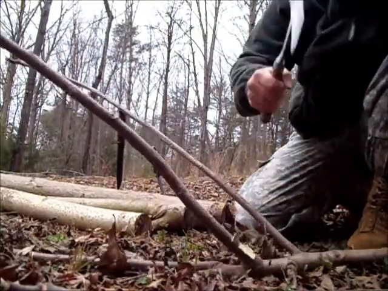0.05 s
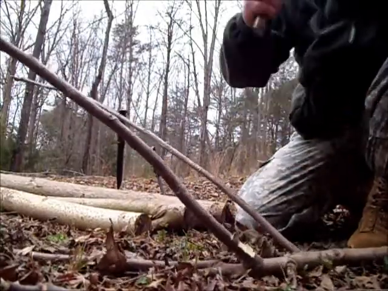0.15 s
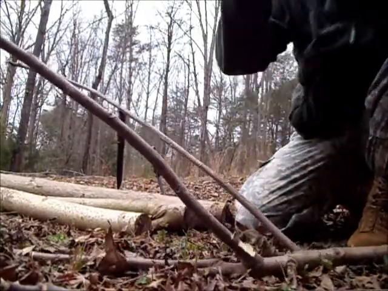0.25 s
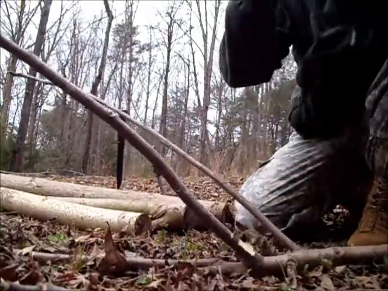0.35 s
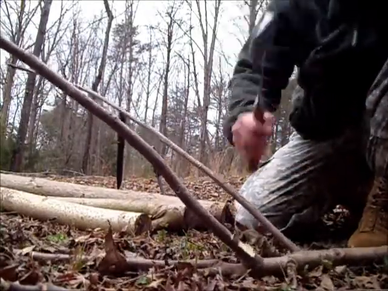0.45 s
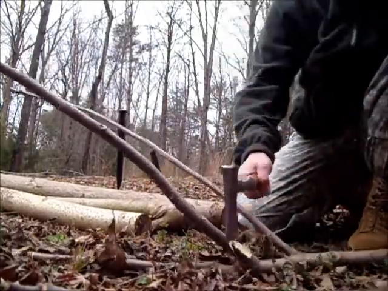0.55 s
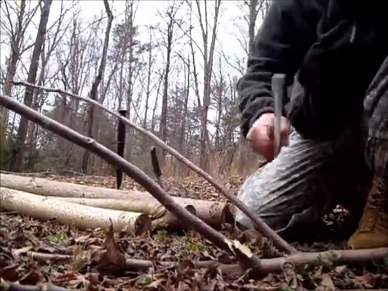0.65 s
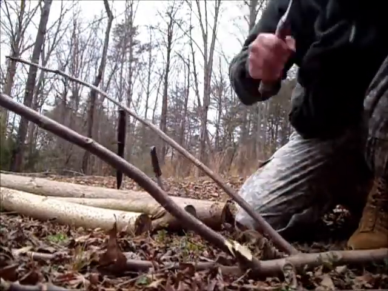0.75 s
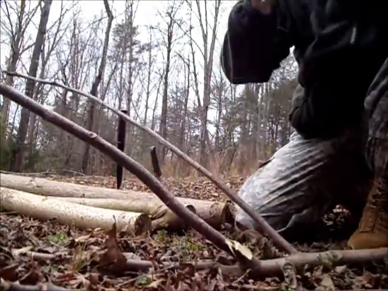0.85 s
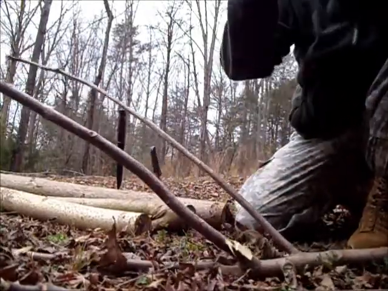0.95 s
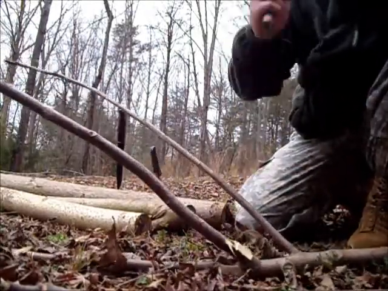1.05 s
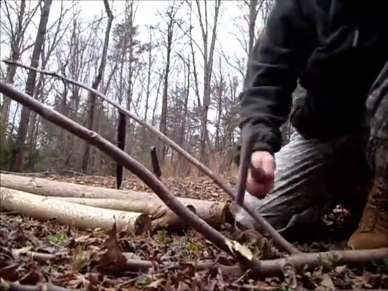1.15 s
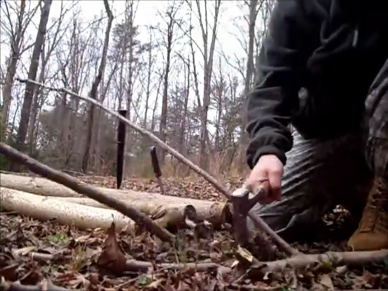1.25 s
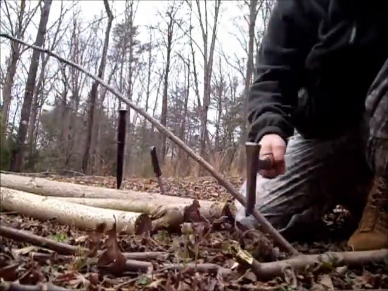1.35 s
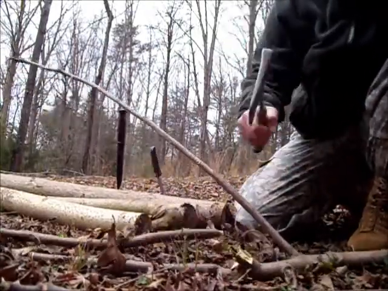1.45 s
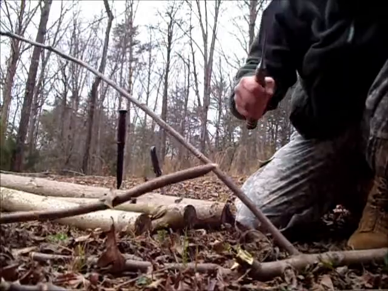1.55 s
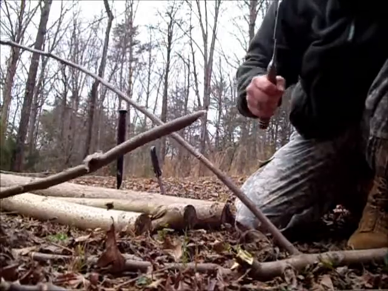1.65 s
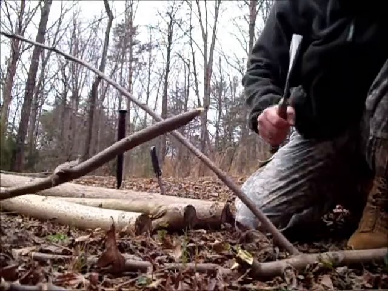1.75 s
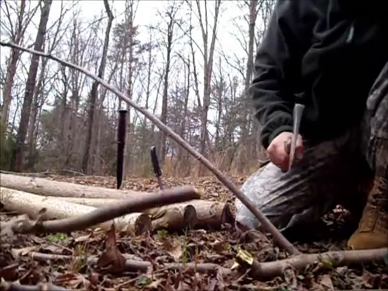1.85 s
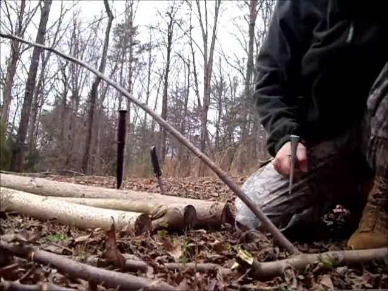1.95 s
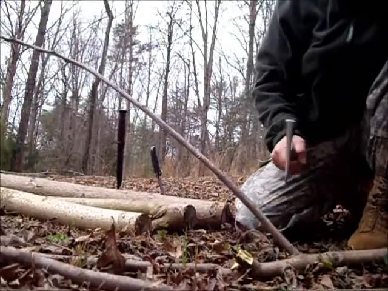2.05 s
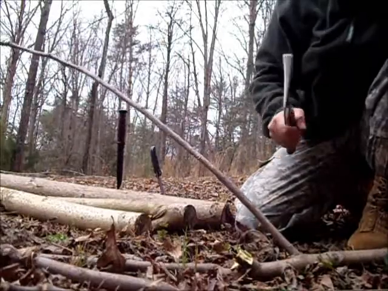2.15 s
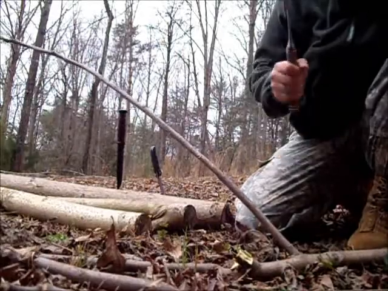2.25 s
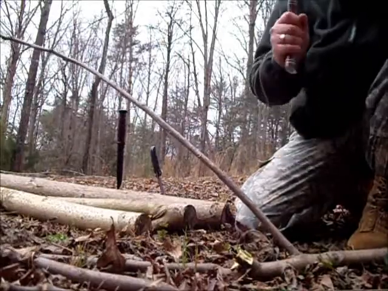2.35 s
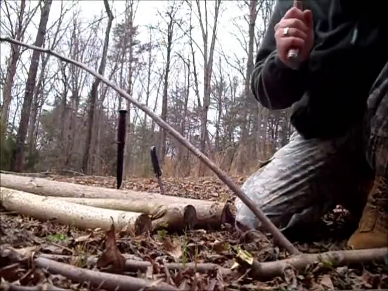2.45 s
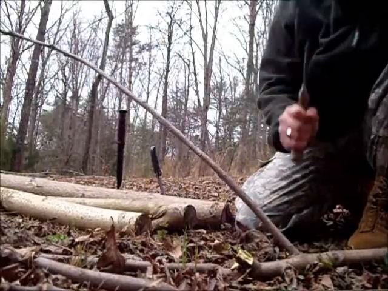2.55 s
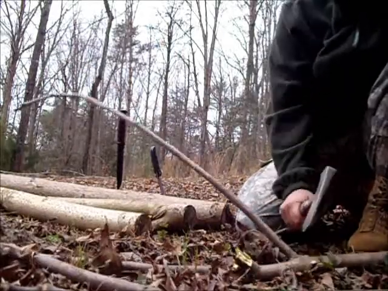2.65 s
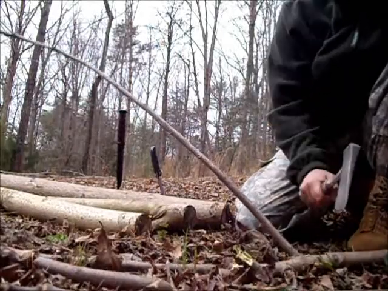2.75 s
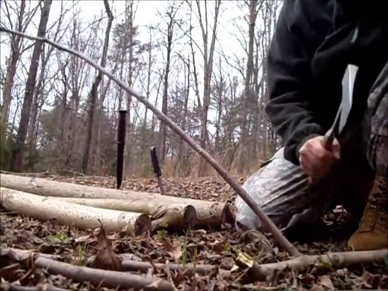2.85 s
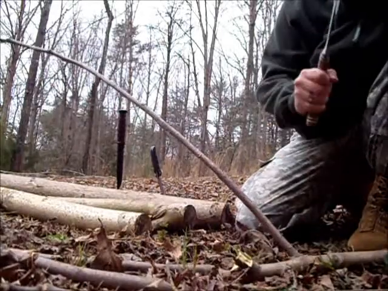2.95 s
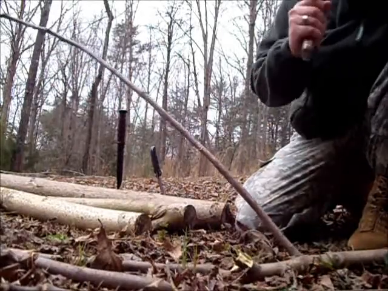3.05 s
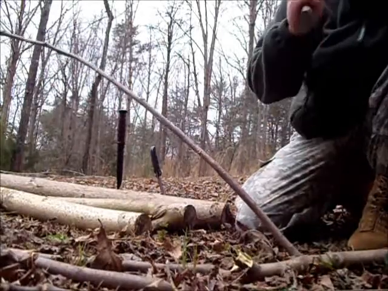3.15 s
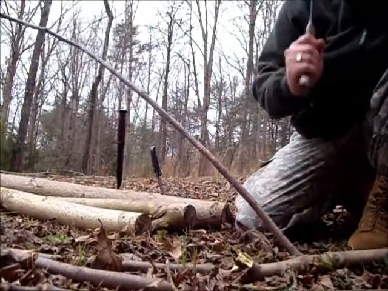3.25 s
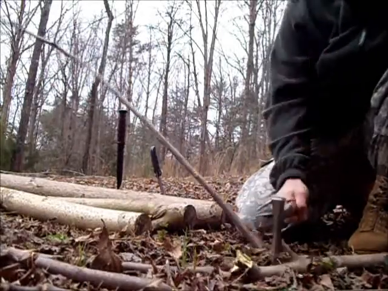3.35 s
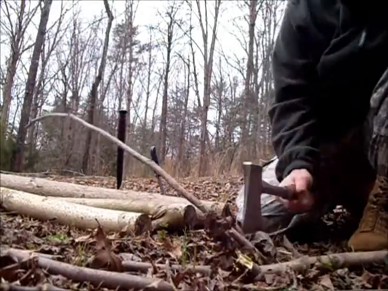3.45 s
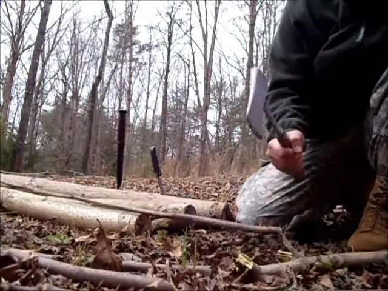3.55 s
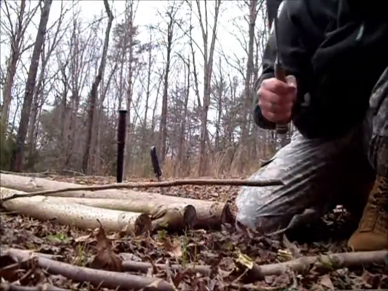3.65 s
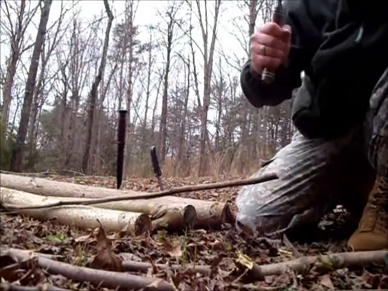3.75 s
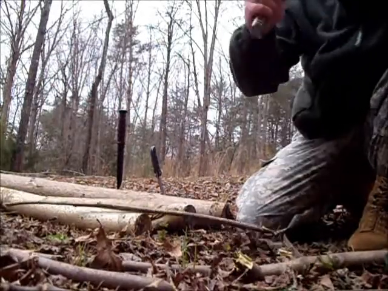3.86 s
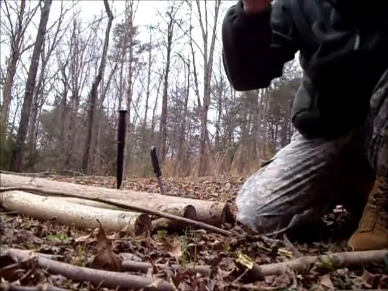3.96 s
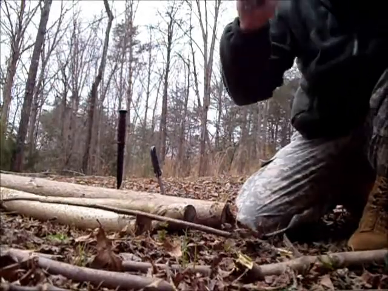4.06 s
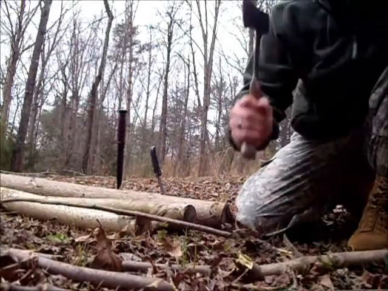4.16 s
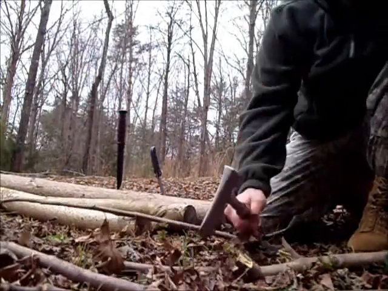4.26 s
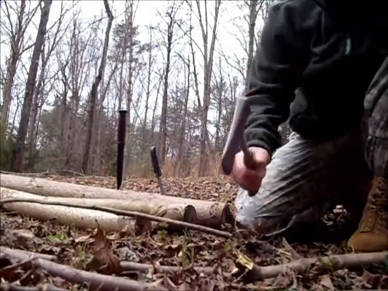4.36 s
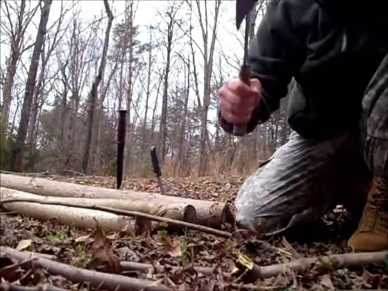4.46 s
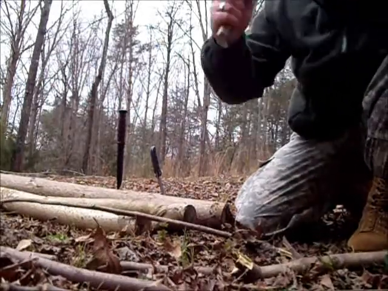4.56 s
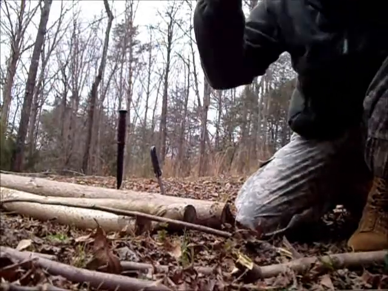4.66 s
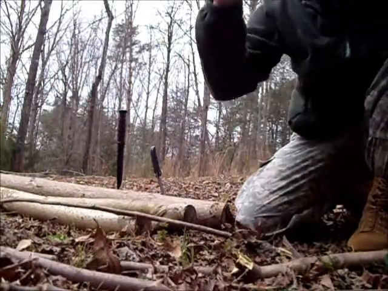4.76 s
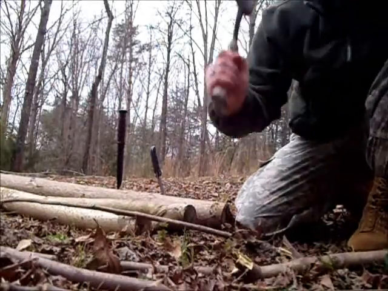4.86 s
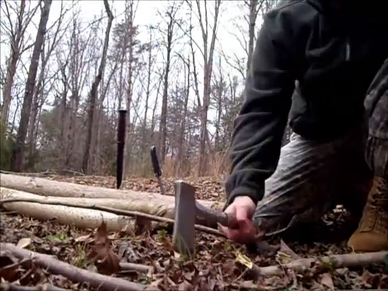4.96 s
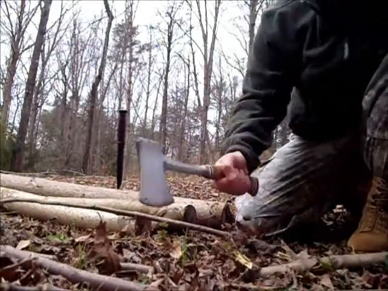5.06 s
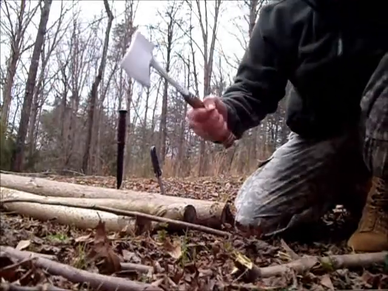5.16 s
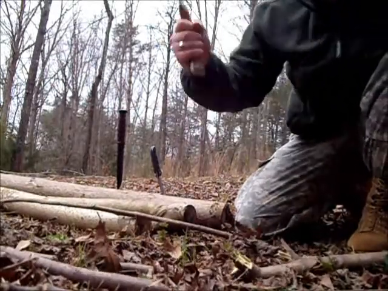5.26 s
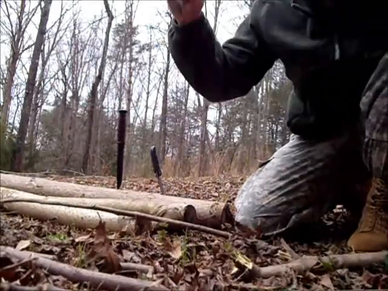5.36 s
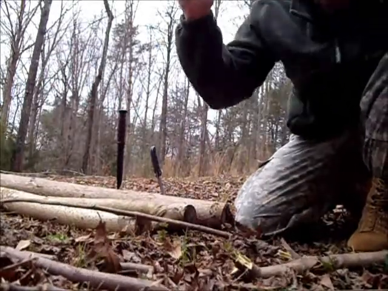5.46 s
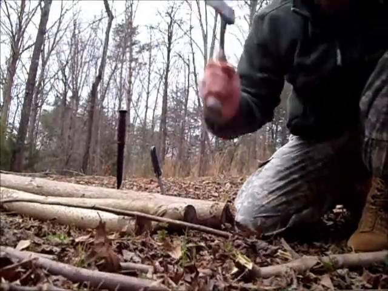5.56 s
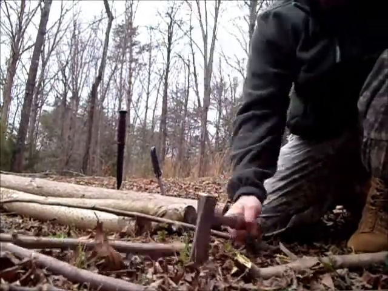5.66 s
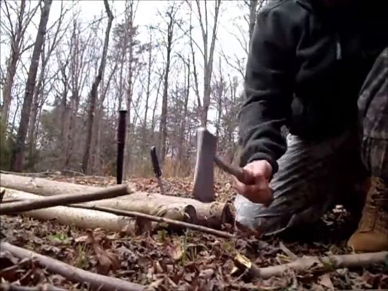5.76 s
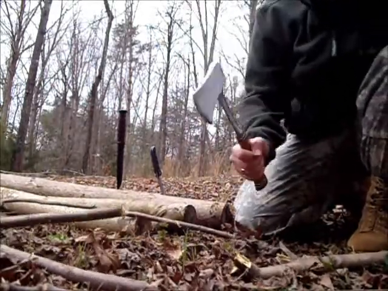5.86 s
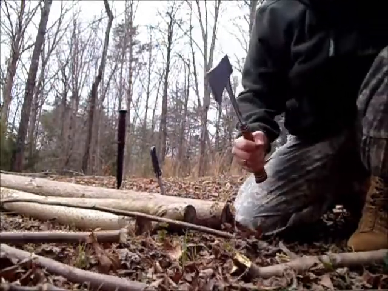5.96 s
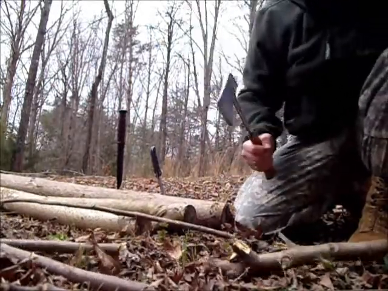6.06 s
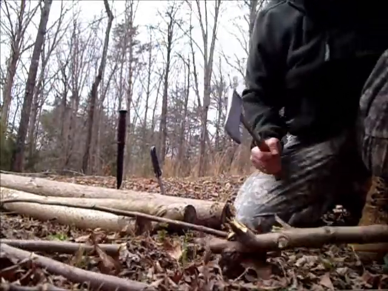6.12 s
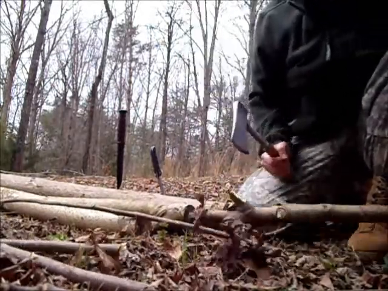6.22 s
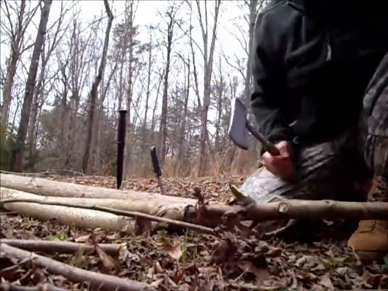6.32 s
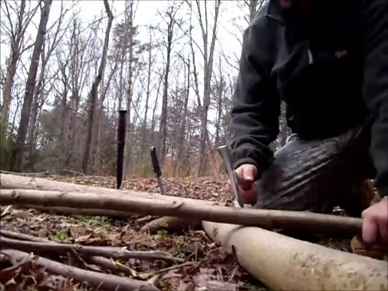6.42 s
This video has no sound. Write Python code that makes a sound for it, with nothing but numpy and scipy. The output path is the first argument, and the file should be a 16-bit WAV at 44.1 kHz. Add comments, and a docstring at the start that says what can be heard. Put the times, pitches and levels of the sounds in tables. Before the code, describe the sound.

Seven close, woody hatchet chops crack and thud outdoors, cut pieces knocking and leaves crackling between them, over a low airy rush.

```python
"""A hatchet chops through sticks lying on a log on a leafy forest floor, seven blows close to the microphone.
Each blow sums damped low modes of the ground, ringing modes of wood and blade, and filtered grains of fracture.
Cut pieces ring and scuff as they land, chips clatter, twigs snap, and shaped noise and ticks stir the dry leaves.
Trunks return a faint echo, built from decaying noise, over a low rush of outdoor air with a thin high whine.
A faint steady-pitched tone dies away at the start."""
import sys
import numpy as np
from scipy import signal
from scipy.fft import rfft, irfft, next_fast_len
from scipy.io import wavfile
from scipy.ndimage import map_coordinates

SR = 44100
rng = np.random.default_rng(int(sys.argv[2]) if len(sys.argv) > 2 else 0)


def unload_wav(signal):
    """Save mono or channel-first audio to the path in sys.argv[1] as 16-bit WAV at rate SR, clipped to [-1, 1]."""
    wavfile.write(
        sys.argv[1],
        SR,
        np.round(np.clip(np.atleast_2d(signal).T, -1, 1) * 32767).astype(np.int16),
    )


N = 286188  # length in samples
T = np.arange(SR // 2) / SR  # time within one event, s


def amp(db):
    """Decibels to gain."""
    return 10 ** (np.asarray(db) / 20)


def unit(x):
    """Scaled to rms 1."""
    return x / np.sqrt(np.mean(x ** 2) + 1e-20)


def at_level(x, db):
    """An event scaled so that its first 30 ms have this rms level."""
    head = x[:round(0.03 * SR)]
    return amp(db) * x / np.sqrt(np.mean(head ** 2) + 1e-20)


def along(points, hz):
    """(Hz, value) points read on a log frequency axis."""
    point_hz, value = np.transpose(points)
    return np.interp(np.log(hz + 1), np.log(point_hz), value)


def colour(x, spectrum):
    """Causal minimum-phase filter with the given (Hz, dB) shape."""
    size = 2 * next_fast_len(len(x))
    gain = amp(along(spectrum, np.fft.rfftfreq(size, 1 / SR)))
    cepstrum = irfft(np.log(gain))
    # folding the cepstrum onto positive time makes the filter causal
    cepstrum[1:size // 2] *= 2
    cepstrum[size // 2 + 1:] = 0
    return irfft(rfft(x, size) * np.exp(rfft(cepstrum)))[:len(x)]


def add(track, start_s, sound):
    """Mix a sound in at its start time."""
    part = track[max(round(start_s * SR), 0):][:len(sound)]
    part += sound[:len(part)]


def burst(hold_s, t60_s):
    """Envelope that holds while the contact lasts, then dies exponentially."""
    return amp(-60 * np.maximum(T - hold_s, 0) / t60_s)


def grains(rate_hz, spread_db, size):
    """Random tiny fractures, a mean rate per second, of widely differing strength."""
    strength = amp(spread_db * np.minimum(rng.standard_exponential(size), 4))
    happens = rng.random(size) < rate_hz / SR
    return unit(happens * strength * rng.choice([-1, 1], size))


def ring(modes, hold_s, attack_s, vary_db, detune, tilt_db=0):
    """Damped modes whose strengths and pitches shift with the contact; tilt is per octave above the first."""
    hz, db, t60_s = np.transpose(modes)[:, :, None]
    strength, pitch, phase = rng.standard_normal((3, len(modes), 1))
    gain = amp(db + vary_db * strength + tilt_db * np.log2(hz / hz[0]))
    waves = np.sin(2 * np.pi * (hz * (1 + detune * pitch) * T + phase))
    return (gain * waves * burst(hold_s, t60_s)).sum(0) * (1 - np.exp(-T / attack_s))


# Spectrum of the open air around the clearing: pitch_hz [Hz], level_db [dB, relative density]
AIR_SPECTRUM = [(12, -39), (20, 2.5), (44, -2.5), (76, -3.5), (133, -8), (171, -8.5), (232, -12),
                (315, -12), (393, -15), (439, -14), (478, -17), (811, -22), (2330, -31.5), (12100, -39.5),
                (15500, -38)]
AIR_DB = -52.5  # rms before the lows drift


def air():
    """A broad outdoor rush whose lows drift, steady hiss above, and a faint high electronic whine."""
    t = np.arange(N) / SR
    rush = amp(AIR_DB) * unit(colour(rng.standard_normal(N), AIR_SPECTRUM))
    low = signal.sosfiltfilt(signal.butter(2, 600, fs=SR, output="sos"), rush)
    hiss = rush - low
    drift = map_coordinates(rng.standard_normal(40), [t * 4])  # four random points a second
    whine = np.sin(2 * np.pi * 15735 * t)
    return hiss + amp(0.49 * drift) * low + amp(-72.0) * whine


TONE_HZ, TONE_DB, TONE_T60_S = 721, -56, 1.25  # pitch, peak level at the start, decay


def faint_ring():
    """One thin sine fades out exponentially from the start."""
    t = np.arange(N) / SR
    return amp(TONE_DB - 60 * t / TONE_T60_S) * np.sin(2 * np.pi * TONE_HZ * t)


# Colour of what the trunks send back: pitch_hz [Hz], level_db [dB, relative]
ECHO_SPECTRUM = [(60, -4.5), (400, -1), (1000, -14), (2000, -6), (3100, -4.5), (4500, -0.5), (12000, 2),
                 (16000, -5)]
# How long the trunks keep scattering: pitch_hz [Hz], t60_s [s]
ECHO_DECAY = [(100, 0.44), (1000, 0.84), (3000, 0.77), (12000, 0.61)]
# the edge of the wood answers all at once: delay, spread, level over the tail
TREELINE_S, TREELINE_SPREAD_S, TREELINE_DB = 0.13, 0.0085, -1.5


def forest(x):
    """Trunks scatter a decaying noise tail, swelling at the tree line; each half second gets a fresh tail."""
    out = np.zeros(N)
    for start in range(0, N, SR // 2):
        hz, t, noise = signal.stft(rng.standard_normal(SR), SR, nperseg=256)
        decay = amp(-60 * t / along(ECHO_DECAY, hz)[:, None])
        fade = decay * (1 - np.exp(-t / 0.0039))
        treeline = 1 + amp(TREELINE_DB) * np.exp(-0.5 * ((t - TREELINE_S) / TREELINE_SPREAD_S) ** 2)
        tail = signal.istft(noise * fade * treeline, SR, nperseg=256)[1]
        tail = colour(tail / np.linalg.norm(tail), ECHO_SPECTRUM)
        add(out, start / SR, signal.fftconvolve(x[start:start + SR // 2], tail))
    return out


def crackles(size, cycles, spread_db):
    """Brief decaying ticks of single leaves, each at its own pitch and strength."""
    start, pitch, strength = rng.random((size, 3)).T[:, :, None]
    step = np.arange(96)  # samples in a tick
    turns = 4500 * 3 ** pitch * step / SR  # 4500 to 13500 Hz
    gain = amp(spread_db * np.minimum(-np.log(1 - strength), 4))
    ticks = gain * np.sin(2 * np.pi * turns) * np.exp(-turns / cycles)
    place = (start * N).astype(int) + step
    return unit(np.bincount(place.ravel(), ticks.ravel(), N)[:N])


# Cut wood sweeps through dry leaves: peak_s [s], level_db [dB, before trim and clumping], half_width_s [s]
RUSTLES = [(1.239, -46, 0.021), (1.353, -47, 0.022), (1.452, -48.5, 0.013), (1.545, -57, .045),
           (1.904, -40, 0.0084), (2.05, -56, .039), (3.42, -55.5, 0.027), (3.54, -51, 0.019),
           (3.87, -63.5, 0.0427), (5.748, -52, 0.013), (5.82, -60.5, 0.028), (5.974, -52.5, 0.0056),
           (6.08, -64.5, 0.11)]
# Spectrum of the leaf litter: pitch_hz [Hz], level_db [dB, relative density]
LEAF_SPECTRUM = [(200, -10), (700, 7), (1300, 3.5), (2000, -3), (3100, 4), (4200, -12.5), (6300, -9.5),
                 (9000, -8), (13000, -1.5), (15500, -10)]
# every blow shakes the litter: level at a usual crack before the trim, dB per dB of crack, rise, decay
SHAKE_DB, SHAKE_GROWS, SHAKE_RISE_S, SHAKE_T60_S = -40.5, 0.08, 0.02, 0.31


def leaves():
    """Clumped noise and crisp ticks swell where wood sweeps the dry leaves and after every blow."""
    t = np.arange(N) / SR
    power = sum(amp(db) ** 2 * np.exp(-0.5 * ((t - peak_s) / half_width_s) ** 2)
                for peak_s, db, half_width_s in RUSTLES)
    shake = np.minimum(T / SHAKE_RISE_S, 1) * amp(-60 * T / SHAKE_T60_S)
    for start_s, _, _, crack_db, _, _ in BLOWS:
        shake_db = SHAKE_DB + SHAKE_GROWS * (crack_db - USUAL_CRACK_DB)
        add(power, start_s, (amp(shake_db) * shake) ** 2)
    clumps = map_coordinates(rng.standard_normal(N // 400), [t * 90], mode="mirror")
    rustle = grains(9000, 2.4, N) + crackles(size=10000, cycles=2.5, spread_db=4.5)
    texture = unit(amp(1.07 * clumps) * colour(rustle, LEAF_SPECTRUM))
    return np.sqrt(power) * amp(-1.0) * texture


# Twigs snap on the ground: start_s [s], level_db [dB], pitch_hz [Hz, centre]
SNAPS = [(.022, -61, 6940), (.533, -48.5, 5870), (1.853, -61.5, 11500), (1.896, -48.5, 6600),
         (3.485, -55.5, 5000), (5.327, -63, 8500), (5.436, -63, 4700), (5.979, -57, 11300)]
# a louder snap lasts longer: usual t60, usual level, dB more that double the t60
SNAP_LIFE_S, SNAP_USUAL_DB, SNAP_DOUBLES_DB = 0.013, -58.5, 7.5


def snaps():
    """Short clusters of fractures, higher for thinner twigs."""
    out = np.zeros(N)
    for start_s, db, hz in SNAPS:
        spectrum = [(hz / 16, -32), (hz / 3, -7), (hz, 0), (hz * 3, -11)]
        t60_s = SNAP_LIFE_S * 2 ** ((db - SNAP_USUAL_DB) / SNAP_DOUBLES_DB)
        snap = colour(grains(6770, 3.3, len(T)) * burst(0.00072, t60_s), spectrum)
        add(out, start_s, at_level(snap, db))
    return out


# Chips of wood clatter down: start_s [s], level_db [dB]
CHIPS = [(0.674, -47.5), (0.724, -60.5), (0.774, -56.5), (1.425, -61.5), (2.725, -54)]
# Spectrum of their clatter: pitch_hz [Hz], level_db [dB, relative density]
CHIP_SPECTRUM = [(300, -20), (1400, -1.5), (2200, -4.5), (3200, 3.5), (4200, -9.5), (7000, -11.5),
                 (15000, -14)]


def chips():
    """Each chip lands with a dry clatter of tiny contacts."""
    out = np.zeros(N)
    for start_s, db in CHIPS:
        clatter = colour(grains(4500, 3.3, len(T)) * burst(0.001, t60_s=0.13), CHIP_SPECTRUM)
        add(out, start_s, at_level(clatter, db))
    return out


def falling(modes, knocks, attack_s, scuff_db, hardest_tilt_db, dulling):
    """Loose wood scuffs and rings at each knock; softer contacts are duller (dB per octave for each dB)."""
    out = np.zeros(N)
    hardest_db = max(db for _, db in knocks)
    for start_s, db in knocks:
        tilt_db = hardest_tilt_db - dulling * (hardest_db - db)
        tone = ring(modes, hold_s=0.002, attack_s=attack_s, vary_db=3.5, detune=0.0034, tilt_db=tilt_db)
        scuff = colour(grains(3200, 0.91, len(T)) * burst(0.0071, 0.1), BITE_SPECTRUM)
        add(out, start_s, at_level(tone, db) + at_level(scuff, db + scuff_db))
    return out


# Modes of the thin cut stick: pitch_hz [Hz], level_db [dB, relative], t60_s [s]
STICK_MODES = [(223.6, -19.5, 0.19), (360, -22.5, 0.16), (586.6, -0.5, 0.16), (896, -26, 0.16),
               (1025, -1.5, 0.065), (1612, -23.5, 0.037), (2060, -32, 0.07)]
# Its bounces on the woodpile: start_s [s], level_db [dB, ring]
STICK_KNOCKS = [(3.534, -30), (3.562, -40), (3.726, -50.5), (3.763, -48.5), (3.833, -43), (3.879, -49.5),
                (4.02, -60), (4.085, -59.5)]


def cut_stick():
    """The thin stick rings in its few modes as it bounces on the woodpile."""
    return falling(STICK_MODES, STICK_KNOCKS, attack_s=0.0023, scuff_db=-26, hardest_tilt_db=4.5, dulling=0.5)


# Modes of the thick cut branch, free to ring: pitch_hz [Hz], level_db [dB, relative], t60_s [s]
BRANCH_MODES = [(296, -0.5, 0.095), (511.7, -2, 0.25), (637, 1, 0.093), (743, -3, 0.085), (937, 0.5, 0.25),
                (1052, -6, 0.1), (1117, -0.5, 0.24), (1520, -8, .07), (2700, -5.5, 0.026),
                (3110, -1, 0.055)]
# Its knocks, struck free or landing: start_s [s], level_db [dB, ring]
BRANCH_KNOCKS = [(.001, -52.5), (.029, -50.5), (.492, -42.5), (0.671, -46), (1.171, -42), (1.265, -58),
                 (1.288, -51.5), (1.427, -59.5), (1.528, -59.5), (1.895, -60.5), (1.986, -56), (2.725, -53)]


def cut_branch():
    """The thick branch rings longer, with a scuff nearly as loud as its tone."""
    return falling(BRANCH_MODES, BRANCH_KNOCKS, attack_s=0.00027, scuff_db=-1,
                   hardest_tilt_db=-2.0, dulling=0.064)


# Low modes of the ground under the log: pitch_hz [Hz], level_db [dB, relative], t60_s [s]
GROUND_MODES = [(56, -2, 0.23), (65, -7.5, 0.25), (86.5, 10, 0.12), (106.1, 0.5, 0.14)]


def thud():
    """The ground is pushed once and swings back in its low modes."""
    swing = sum(amp(db - 60 * T / t60_s) * np.sin(2 * np.pi * hz * T) for hz, db, t60_s in GROUND_MODES)
    return swing * (1 - np.exp(-T / 0.0009))


# Modes of the log that backs the cut: pitch_hz [Hz], level_db [dB, relative], t60_s [s]
LOG_MODES = [(114, -2.5, 0.18), (189, -8, 0.12), (240.5, 1.5, 0.088), (303, -7.5, 0.082),
             (364, -9.5, 0.054), (477, -6.5, 0.068)]
# Spectrum of its dull crush: pitch_hz [Hz], level_db [dB, relative density]
CRUSH_SPECTRUM = [(60, -23.5), (150, -4.5), (240, -6), (330, -5.5), (410, -7), (520, -8.5), (900, -16.5),
                  (2000, -38.5)]
# it answers a harder knock only a little: reference level, dB per dB of knock
LOG_DB, LOG_GROWS = -25, 0.18


def log_under_cut(harder_db):
    """The backing log rings low while its surface is dully crushed."""
    log_db = LOG_DB + LOG_GROWS * harder_db
    log = ring(LOG_MODES, hold_s=0.0014, attack_s=0.0012, vary_db=4, detune=0.021)
    crush = colour(grains(3000, 2.2, len(T)) * burst(0.0041, 0.14), CRUSH_SPECTRUM)
    return at_level(log, log_db - 3.5) + at_level(crush, log_db - 4.5)


# Modes of the stick pinned under the blade: pitch_hz [Hz], level_db [dB, relative], t60_s [s]
PINNED_MODES = [(609, -1, 0.027), (691, -5, 0.055), (766, -5, 0.069), (847, -1.5, 0.041),
                (1018, 2.5, 0.026), (1196, 4.5, 0.048), (1374, -18.5, 0.12), (1560, -20, 0.096),
                (1635, -20, 0.073), (2020, -19, .035)]
# Spectrum of the edge biting in: pitch_hz [Hz], level_db [dB, relative density]
BITE_SPECTRUM = [(150, -30.5), (450, -10.5), (800, 2), (1300, 1), (1650, -12.5), (2300, -13.5),
                 (4000, -32.5)]


def knock(knock_db, tilt_db):
    """The pinned stick rings briefly while the edge bites in with many tiny fractures."""
    stick = ring(PINNED_MODES, hold_s=0.0043, attack_s=0.00092, vary_db=4.5, detune=0.016, tilt_db=tilt_db)
    bite = colour(grains(5000, 2.3, len(T)) * burst(0.01, 0.051), BITE_SPECTRUM)
    return at_level(stick, knock_db - 4.0) + at_level(bite, knock_db - 4.5)


# Modes of blade on wood, a bright ring: pitch_hz [Hz], level_db [dB, relative], t60_s [s]
BLADE_MODES = [(2237, -17, 0.024), (2315, -4, 0.024), (2585, -6, 0.028), (2654, -10.5, 0.06),
               (2886, 3.5, 0.045), (3190, 5, 0.017)]
BLADE_VARY_DB = 3  # how much they differ from contact to contact
# Spectrum of the cracking fibres: pitch_hz [Hz], level_db [dB, relative density]
CRACK_SPECTRUM = [(600, -45), (1400, -5), (2000, -3.5), (2800, -1.5), (3400, 1), (3900, -13.5), (5000, -10),
                  (8000, -36)]
# Spectrum of the fine splinters: pitch_hz [Hz], level_db [dB, relative density]
SPLINTER_SPECTRUM = [(2000, -45.5), (3800, -1.5), (5000, -5), (6100, 4.5), (7500, -0.5), (9500, -3),
                     (12000, -1), (14000, -6.5), (16000, -5)]
# a solid knock splinters less: splinters over the crack, dB lost per dB of knock
SPLINTER_DB, SPLINTER_FALLS = -2.5, 0.62
# a louder crack tears for longer: usual length, dB of crack that double it
TEAR_S, TEAR_DOUBLES_DB = 0.004, 16.5


def tearing(crack_db, harder_db, wait_s):
    """The blade rings brightly as fibres crack and splinter in dense bursts of fractures."""
    splinter_db = crack_db + SPLINTER_DB - SPLINTER_FALLS * harder_db
    tear_s = TEAR_S * 2 ** ((crack_db - USUAL_CRACK_DB) / TEAR_DOUBLES_DB)
    blade = ring(BLADE_MODES, hold_s=0.0023, attack_s=0.000775, vary_db=BLADE_VARY_DB, detune=0.012)
    # the edge enters the bark more quietly before the wood gives way
    parting = amp(-7 * np.clip((wait_s - T) / 0.0016, 0, 1))
    crack = colour(grains(5000, 3.8, len(T)) * parting * burst(wait_s + tear_s, 0.044), CRACK_SPECTRUM)
    splinters = grains(8000, 3.8, len(T)) * parting * burst(wait_s + tear_s, 0.019)
    splinters = colour(splinters, SPLINTER_SPECTRUM)
    return (at_level(crack, crack_db - 0.8) + at_level(blade, crack_db - 6.0)
            + at_level(splinters, splinter_db))


# The blade glances on after the last cut: start_s [s], level_db [dB, reference for ping and scrape]
GLANCES = [(5.639, -35.5)]


def glances():
    """The glancing blade pings brightly and scrapes over the fibres."""
    out = np.zeros(N)
    for start_s, db in GLANCES:
        ping = ring(BLADE_MODES, hold_s=0.00242, attack_s=0.0003, vary_db=BLADE_VARY_DB,
                    detune=0.0067, tilt_db=9.0)
        scrape = colour(grains(6000, 1.6, len(T)) * burst(0.0061, 0.03), CRACK_SPECTRUM)
        add(out, start_s, at_level(ping, db + 1.0) + at_level(scrape, db - 5.5))
    return out


# Hatchet blows close to the microphone: start_s [s], knock_db [dB, reference for stick and bite],
# thud_db [dB, ground], crack_db [dB, reference for crack, blade and splinters],
# tilt_db [dB per octave, stick modes], wait_s [s until the fibres part]
BLOWS = [(0.474, -26.5, -30, -28.5, -5, 0.0013), (1.153, -30, -25, -26, -4, 0.0018),
         (2.6005, -27, -31.5, -42, -9.5, 0), (3.332, -30.5, -36.5, -35, 16, 0.007),
         (4.203, -17, -22.5, -39, -7.5, 0.0026), (4.9182, -16, -21, -29, -5, 0),
         (5.613, -17, -23, -25, 7.5, 0)]
USUAL_KNOCK_DB, USUAL_CRACK_DB = -24.5, -32  # an ordinary blow, from which the level rules start


def chops():
    """The blade drives in for some milliseconds, thumping ground and log, knocking wood and tearing fibres."""
    out = np.zeros(N)
    for start_s, knock_db, thud_db, crack_db, tilt_db, wait_s in BLOWS:
        harder_db = knock_db - USUAL_KNOCK_DB
        add(out, start_s, at_level(thud(), thud_db) + log_under_cut(harder_db))
        add(out, start_s, knock(knock_db, tilt_db))
        add(out, start_s, tearing(crack_db, harder_db, wait_s))
    return out


def scene():
    """All the wood and leaf sounds, their echo, the faint tone and the open air."""
    pieces = cut_branch() + cut_stick()
    wood = chops() + glances() + pieces + snaps() + chips() + leaves()
    echo = amp(-21.5) * forest(wood)
    return (wood + echo + faint_ring() + air())[None]


TOP_HZ = 16000  # band limit


def record(dry):
    """The recorder rounds off the highest peaks and keeps nothing above its band limit."""
    held = dry / (1 + np.abs(dry / 0.55) ** 8) ** (1 / 8)
    size = next_fast_len(N + SR // 2)
    passed = np.fft.rfftfreq(size, 1 / SR) < TOP_HZ
    return irfft(rfft(held, size) * passed, size)[:, :N]


dry = scene()
out = record(dry)
unload_wav(out)
```